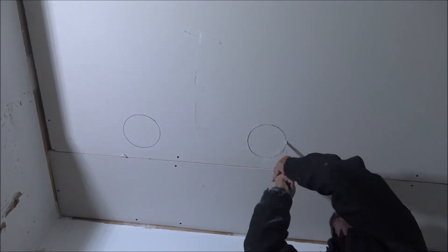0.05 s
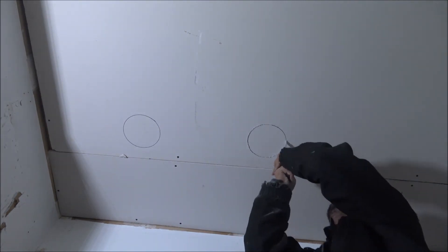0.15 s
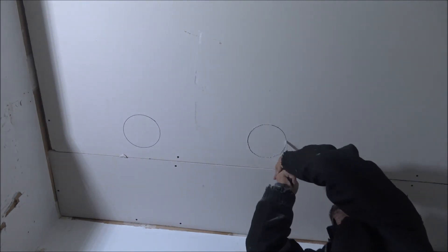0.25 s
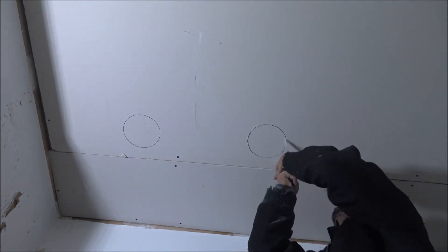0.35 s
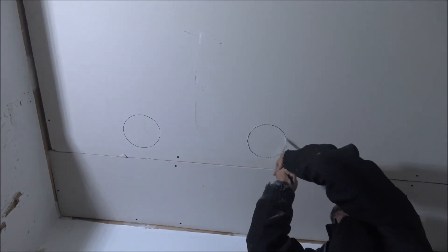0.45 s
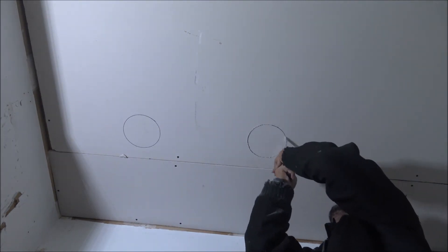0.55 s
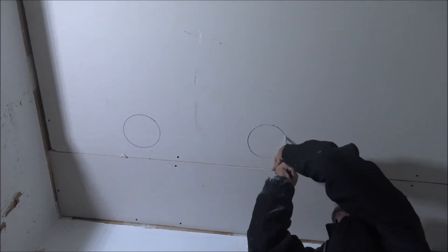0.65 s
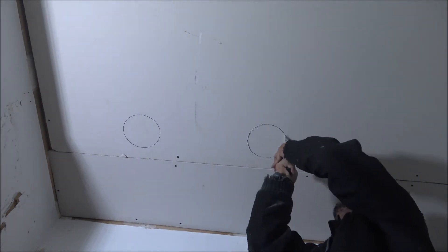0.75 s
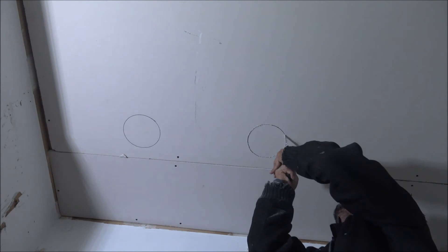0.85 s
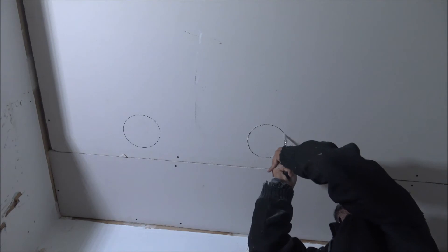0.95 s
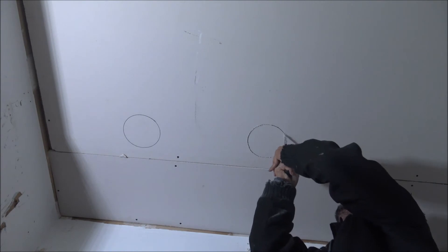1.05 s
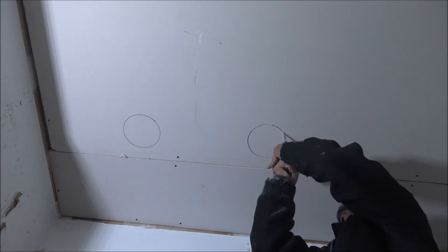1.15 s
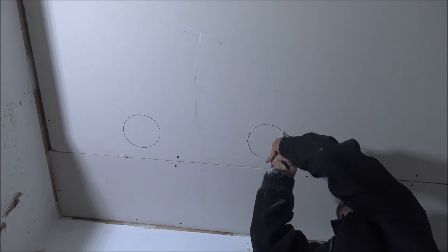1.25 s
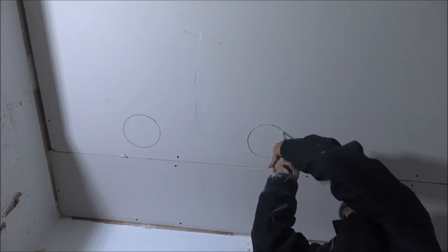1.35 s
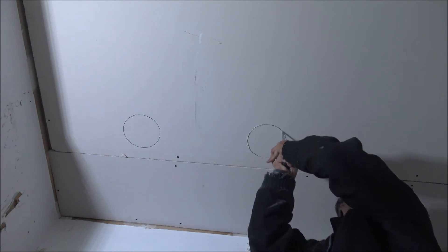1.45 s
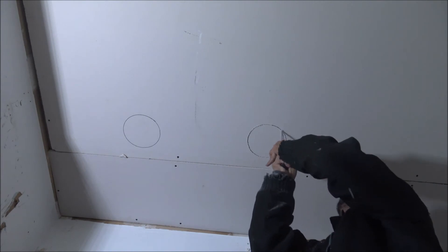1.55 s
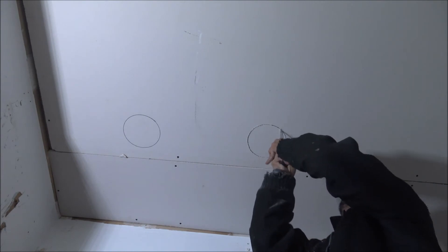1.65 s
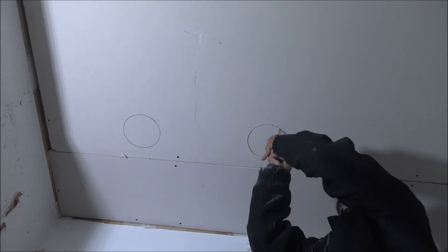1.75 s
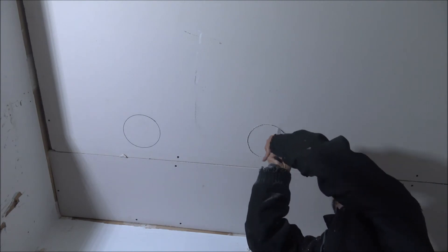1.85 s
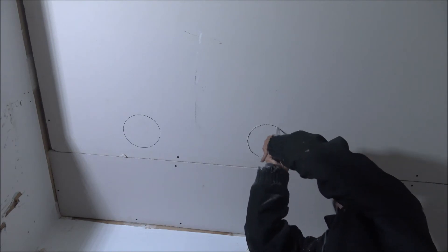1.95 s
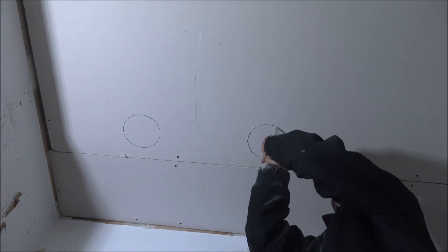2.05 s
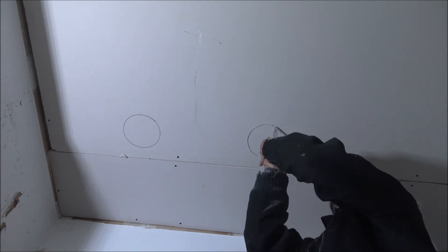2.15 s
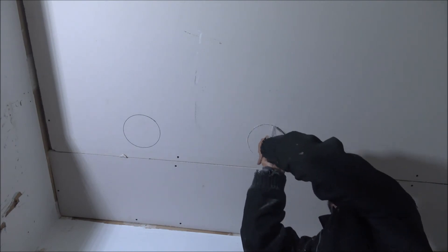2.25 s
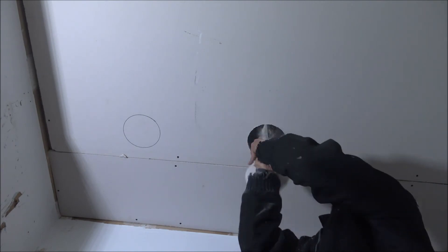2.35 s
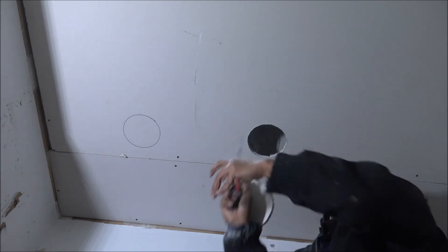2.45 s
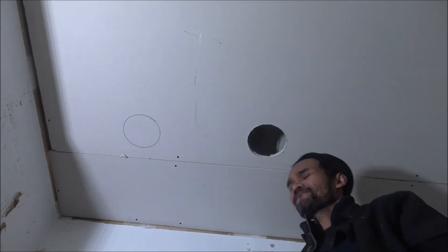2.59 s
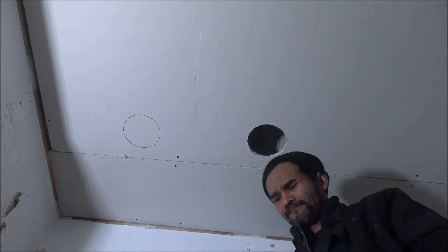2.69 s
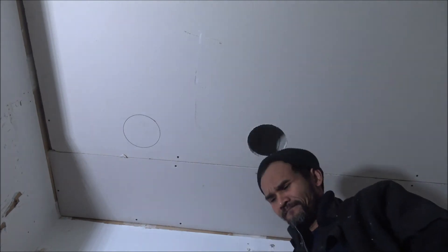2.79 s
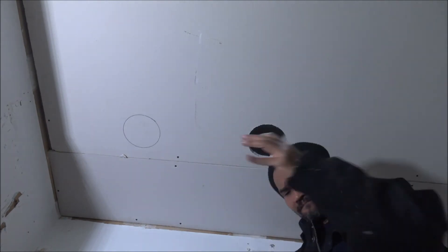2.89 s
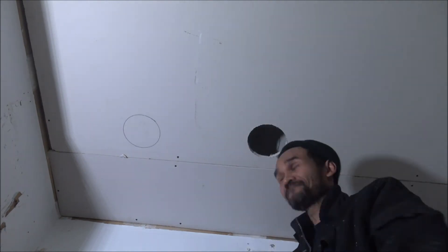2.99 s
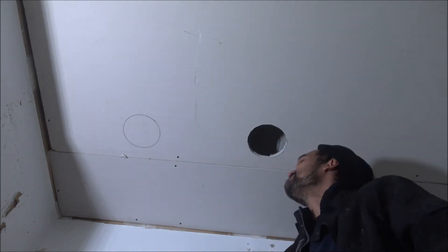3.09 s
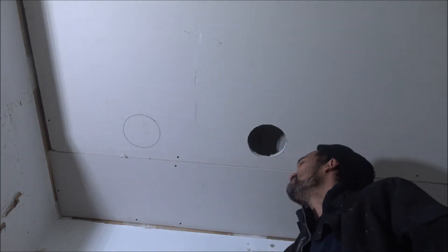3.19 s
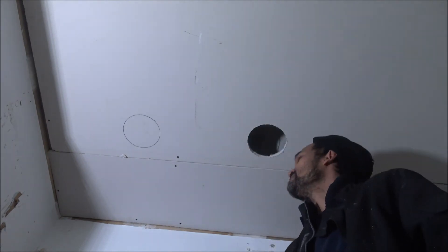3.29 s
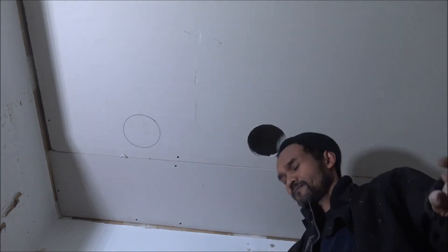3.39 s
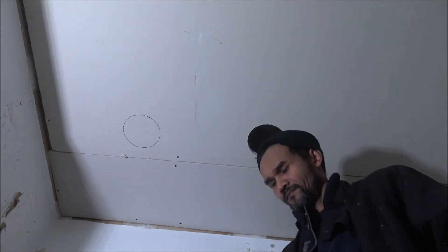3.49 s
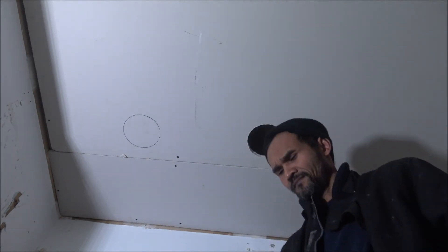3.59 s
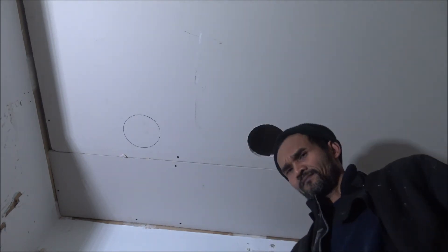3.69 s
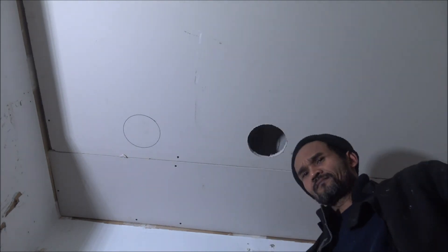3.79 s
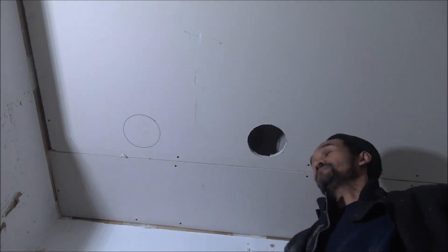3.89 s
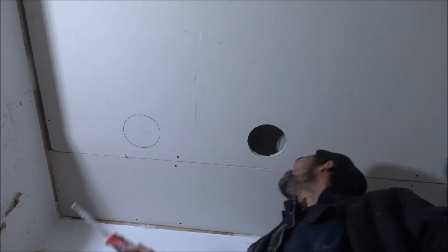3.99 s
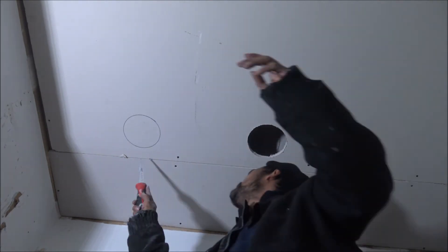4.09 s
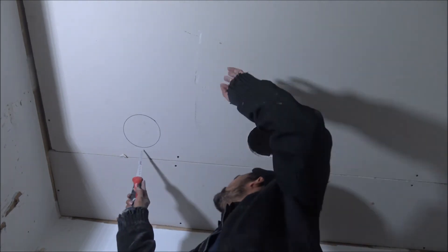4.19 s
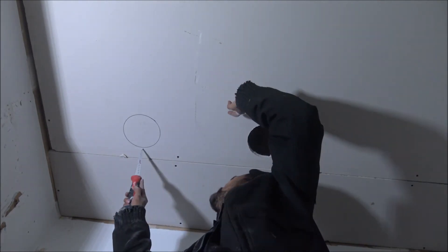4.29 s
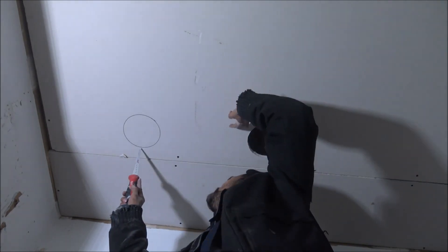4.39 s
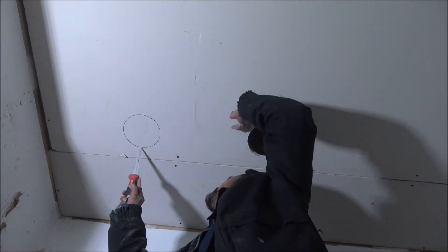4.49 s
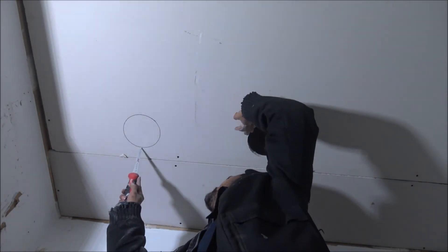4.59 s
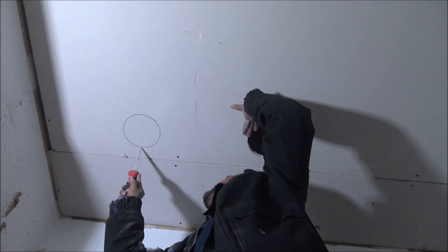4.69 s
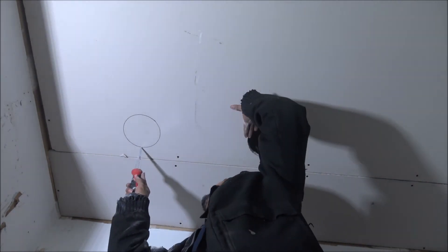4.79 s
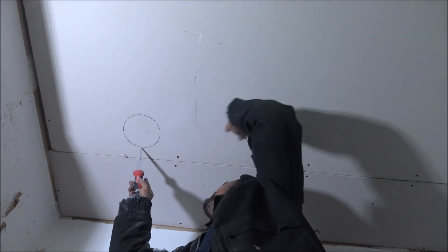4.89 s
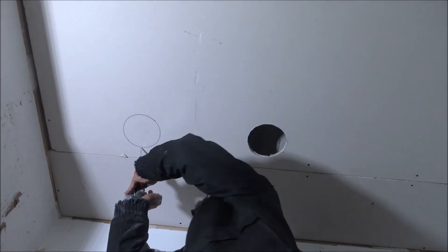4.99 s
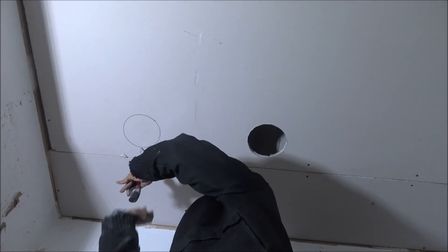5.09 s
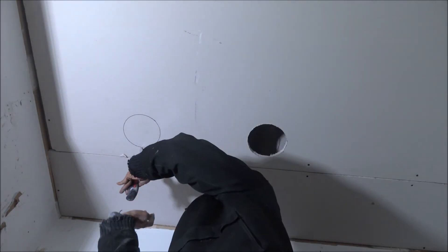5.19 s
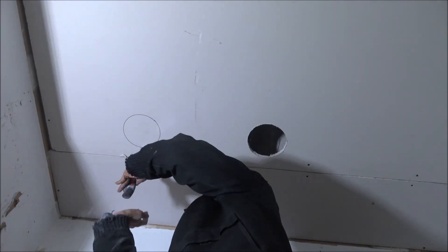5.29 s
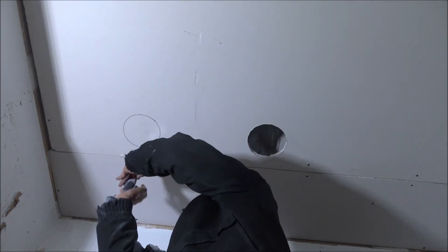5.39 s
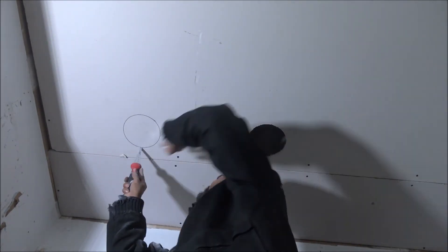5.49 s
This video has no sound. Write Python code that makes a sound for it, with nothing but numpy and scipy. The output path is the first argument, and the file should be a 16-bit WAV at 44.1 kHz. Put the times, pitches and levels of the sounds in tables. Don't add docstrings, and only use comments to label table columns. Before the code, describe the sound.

Fast hand sawing of hollow drywall, metallic blade scrapes, feet shuffling, light tip knocks, and three dull drum-like thumps in a small room.

```python
import sys
import numpy as np
from scipy import signal
from scipy.fft import rfft, irfft
from scipy.io import wavfile
from scipy.ndimage import uniform_filter1d, map_coordinates

SR = 44100
rng = np.random.default_rng(int(sys.argv[2]) if len(sys.argv) > 2 else 0)


def amplitude_ratio(level_db):
    exponent = np.asarray(level_db, float) / 20
    return 10 ** exponent


def generate_wav(signal):
    frames = np.transpose(np.atleast_2d(signal))
    scaled = np.clip(frames, -1, 1) * 32767
    pcm = np.round(scaled).astype(np.int16)
    wavfile.write(sys.argv[1], SR, pcm)


N = 244314
T = np.arange(N) / SR
HZ = np.fft.rfftfreq(16384, 1 / SR)

# time in seconds, stir of the worker in dB, hum level in dB.
BACKGROUND = [(0, 2.5, -58), (.1, 8, -52), (2.45, 12, -67), (2.95, 5, -62), (3.1, 3.5, -58),
              (3.2, -2.5, -55.5), (3.32, -0.5, -51), (3.36, 4, -53), (3.6, 0, -56.5), (3.8, 8, -53),
              (4.2, 8.5, -50), (4.4, 1.5, -58), (4.58, 2.5, -51.5), (4.7, 7.5, -52.5), (5.05, 4.5, -53),
              (5.54, 2, -53)]


def unit(x):
    return x / np.sqrt(np.mean(x ** 2) + 1e-20)


def along(points, hz):
    f, v = np.transpose(points)
    return np.interp(np.log(hz + 1), np.log(f + 1), v)


def causal(gain):
    cepstrum = irfft(np.log(gain + 1e-6 * gain.max()))
    half = len(cepstrum) // 2
    cepstrum[1:half] *= 2
    cepstrum[half + 1:] = 0
    h = irfft(np.exp(rfft(cepstrum)))[:8192]
    return h / np.linalg.norm(h)


def even(points_db):
    return np.fft.fftshift(irfft(amplitude_ratio(along(points_db, HZ))))


def through(x, h):
    return signal.fftconvolve(x, h)[:N]


def band(lo_hz, hi_hz):
    return 1 / np.sqrt((1 + (lo_hz / (HZ + 1)) ** 12) * (1 + (HZ / hi_hz) ** 12))


def body(tone, modes):
    lift = sum(amplitude_ratio(2 * db) / (1 + (2 * (HZ - hz) / width) ** 2) for hz, width, db in modes)
    return amplitude_ratio(along(tone, HZ)) * np.sqrt(1 + lift)


def grit(rate, spread_db, share):
    chance, size = rng.random(N), rng.exponential(1, N)
    sign, dust = rng.standard_normal(N), rng.standard_normal(N)
    bites = (chance < rate / SR) * amplitude_ratio(spread_db * np.minimum(size, 4)) * sign
    return np.sqrt(share) * unit(bites) + np.sqrt(1 - share) * dust


def voiced(rows, mix):
    return [(s, length, *(db + np.array([1, *controls]) @ np.array(mix)))
            for s, length, db, *controls in rows]


def contacts(rows, material, gains, attack, sag_db, t60, boost_db, lead=0, **grain):
    part_edges = {"saw": [(250, 750), (750, 2500), (2500, 20000), (20, 250)], "steel": [(20, 1500),
                  (1500, 4500), (4500, 7500), (7500, 20000)], "feet": [(20, 300), (300, 2000), (2000, 6000),
                  (6000, 20000)], "tip": [(20, 800), (800, 2000), (2000, 6000), (6000, 20000)],
                  "palm": [(20, 300), (300, 1000), (1000, 3500), (3500, 20000)]}
    attacks, leads = np.broadcast_to(attack, 4), np.broadcast_to(lead, 4)
    power = np.zeros((4, N + SR))
    for s, length, *levels in rows:
        t = np.arange(-round(.02 * SR), round((length + max(t60)) * SR)) / SR
        start = round((s + t[0]) * SR)
        held_db = sag_db * np.clip(t / length, 0, 1) ** 3
        for part, db, fall, up, early in zip(power, levels, t60, attacks, leads):
            rise = np.sin(np.pi / 2 * np.clip((t + early) / min(up, length + early), 0, 1)) ** 2
            decay_db = -60 * np.maximum(t - length, 0) / fall
            part[start:][:len(t)] += (rise * amplitude_ratio(db + held_db + decay_db)) ** 2
    drives = np.sqrt(power[:, :N]) * amplitude_ratio(boost_db) * grit(**grain)
    return [sum(through(drive, causal(gain * band(*edge)))
                for drive, edge in zip(drives, part_edges[material])) for gain in gains]


def patchy(x, depth_db):
    z = signal.stft(x, nperseg=512)[2]
    field = uniform_filter1d(rng.standard_normal(z.shape), size=5, axis=0)
    field = uniform_filter1d(field, size=6, axis=1)
    gain = amplitude_ratio(depth_db * unit(field))
    return signal.istft(z * unit(gain), nperseg=512)[1][:N]


def air():
    # frequency in Hz, level in dB per Hz.
    air_tone = [(40, -33), (58, -22), (78, -27), (130, -20), (240, -25.5), (480, -21), (900, -27.5),
                (2000, -32), (4600, -33), (5600, -37), (15500, -38.5), (16500, -62.5)]
    # level at rest in dB, growth in dB per dB of stir.
    stir_mix = [(-59.5, 0.73), (-63.5, 0.7), (-66.5, 1.33)]
    s, stir_db, _ = np.transpose(BACKGROUND)
    stir_db = np.interp(T, s, stir_db)
    tone = amplitude_ratio(along(air_tone, HZ))
    shapes = [tone * band(40, 2200), tone * band(2200, 5700), tone * band(6000, 20000)]
    layers = [amplitude_ratio(db + grows * stir_db) * through(rng.standard_normal(N), causal(shape))
              for (db, grows), shape in zip(stir_mix, shapes)]
    return patchy(sum(layers), depth_db=-0.5)


def waver(rate):
    return map_coordinates(rng.standard_normal(int(N * rate / SR) + 4), [T * rate])


def hum():
    s, _, hum_db = np.transpose(BACKGROUND)
    level_db = np.interp(T, s, hum_db) - 0.5 + 1.5 * waver(7)
    phase = 2 * np.pi * np.cumsum(99 + 5 * waver(11)) / SR
    return amplitude_ratio(level_db) * np.sin(phase)


def feet():
    # start in seconds, length in seconds, force in dB, weight in dB, falling dust in dB.
    moves = [(.105, 0.012, -46, -13, -11), (.143, 0.0054, -33.5, -3, -4), (3.335, 0.024, -63, 1, 2),
             (3.666, 0.022, -49.5, 12.5, 3), (3.691, 0.036, -41, -7, 4.5), (3.716, 0.015, -33.5, -5, -6),
             (3.762, 0.019, -51, 6, 5), (3.79, 0.012, -54, -6, 13), (3.867, .012, -33, -4, -8),
             (3.89, 0.025, -56, 13, -2), (3.96, 0.0098, -26, -14, -15), (4.0, 0.038, -53, -1, 5),
             (4.046, 0.016, -32, -12, 4), (4.058, 0.01, -28, 1, 4), (4.095, 0.021, -45, -19, 11),
             (4.135, 0.031, -48.5, -11, -1)]
    # frequency in Hz, width in Hz, lift in dB.
    ladder = [(163, 61, 1), (571, 48, -5), (975, 94, 5.5), (3160, 560, 13.5), (4460, 420, 11.5)]
    # frequency in Hz, level in dB per Hz.
    move_tone = [(20, -53), (80, -20), (160, -1.5), (230, -17.5), (600, -8.5), (1360, -18), (4600, -23.5),
                 (15500, -26.5), (16500, -46.5)]
    # dB per dB in thud, knock, scuff and dust; the first is dB over the force.
    feet_mix = [(0.14, 0.55, -1.6, -1.5), (1, 0.22, -0.17, 0.1), (0, -0.13, 0.19, 0.93)]
    return contacts(voiced(moves, feet_mix), "feet", [body(move_tone, ladder)], attack=0.0015, sag_db=-2.5,
                    t60=[0.099, 0.099, 0.046, 0.057], boost_db=-0.5, rate=3600, spread_db=0.5, share=0.4)[0]


def strokes():
    # start in seconds, force in dB, sheet flex in dB.
    run_a = [(0.161, -21, -6), (0.264, -19.5, -6), (0.321, -14.5, 1.5), (0.367, -16, -8.5), (0.428, -18, 2),
             (0.478, -17.5, -3.5), (0.526, -17.5, 2), (0.575, -17, -5), (0.619, -19, 3),
             (0.696, -19.5, -1.5), (0.77, -20, 6), (0.849, -20.5, -1), (0.912, -18.5, 6),
             (0.97, -18.5, -1.5), (1.023, -18, 2), (1.075, -17, -5), (1.122, -12.5, 3.5),
             (1.153, -18.5, -2.5), (1.2, -18, 2.5), (1.242, -18.5, 1.5), (1.283, -17.5, 4),
             (1.335, -20.5, -0.5), (1.392, -25, -3), (1.438, -28, -3.5)]
    run_b = [(1.495, -18.5, 2.5), (1.538, -19, -5), (1.595, -12.5, 2.5), (1.643, -18, -4),
             (1.697, -15.5, 3.5), (1.727, -21.5, 4.5), (1.779, -19, 6.5), (1.822, -23.5, 6),
             (1.863, -15.5, 4), (1.908, -19, 0), (1.95, -20, 4.5), (1.995, -22.5, 7.5), (2.036, -18.5, 6),
             (2.085, -21, 4.5), (2.126, -20.5, 6), (2.179, -24, 8.5), (2.221, -21.5, 6.5),
             (2.265, -24, 1.5), (2.307, -18, 3), (2.351, -20.5, -2)]
    crumble_a = [-0.46, 1, 0.25, .5, -1, -.5, 0, -1.5, -0.43, 0.36, 0, 1.2, 0, -1, 0.25, -1.2, -0.7, -.5, 1,
                 -.5, 1, -1.1, 0, 0.97]
    crumble_b = [.5, 0, 0, 0, -.5, 1, -.5, 1.5, -1, 1, 0, .5, 0, -1, -1, .5, 0, 1, 1, 1]
    # start in seconds, length in seconds, force in dB, sheet flex in dB.
    drags = [
        (.167, .006, -22, -5),
        (.25, 0.024, -23, -2),
        (.668, 0.032, -34.5, -6),
        (.75, 0.018, -38.5, -6.5),
        (.815, .036, -38, 0.5),
    ]
    # dB over the force, or dB per dB, in board, rasp, grit and boom.
    pull_mix = [(0, 0.33, -7, -8.5), (.95, 0.075, 0, -0.5)]
    push_mix = [(0, -0.39, -6.5, -10.5), (.95, 0.23, 0.13, -0.06)]
    wear_db_per_s = (-0.3, -0.5, -0.35, -1.7)
    crumble_mix = (0, 0, 1, 0.07)
    # share of the time to the turn, longest bite in s
    fill, longest_s = (0.95, 1.066), (.045, 0.058)
    rows = []
    for run, crumble, last_s in zip((run_a, run_b), (crumble_a, crumble_b), (0.032, 0.075)):
        gaps = np.diff([row[0] for row in run])
        lengths = [min(fill[k % 2] * gap, longest_s[k % 2]) for k, gap in enumerate(gaps)] + [last_s]
        for k, ((s, db, flex), length) in enumerate(zip(run, lengths)):
            mix = (pull_mix, push_mix)[k % 2]
            growth_s = s - run_b[0][0]
            rows += voiced([(s, length, db, flex, growth_s, crumble[k])], [*mix, wear_db_per_s, crumble_mix])
    return rows + voiced(drags, push_mix)


def saw():
    # frequency in Hz, width in Hz, lift in dB with a short cut, lift in dB with a long cut.
    sheet = [(131.5, 12, 14.5, 14), (290, 13, 17, 9.5), (390, 17.7, 19, 2.5), (457, 63, 4.5, 10.5),
             (569.6, 29.4, 11.5, 15.5), (727, 19, 8.5, 8.5), (989, 18, 14.5, 9), (1076.5, 29, 11, 2),
             (1272, 23, 11, 3.5), (1462, 23, 8, 9), (1660, 37, 5, 5), (1947, 96, 7.5, 7),
             (215, 16, 4.5, -0.5), (2440, 50, 4.5, -0.5), (4120, 90, 4.5, 8), (4930, 480, 4.5, 3.5),
             (9630, 350, 0.5, 2.5), (10460, 250, 5.5, 7.5), (11150, 350, 9, 1), (13200, 500, 3, 4.5),
             (14700, 800, 2.5, 4.5)]
    # frequency in Hz, level in dB per Hz.
    saw_tone = [(20, -34.5), (70, -41), (110, -21.5), (170, -22), (330, -13.5), (600, -9.5), (1000, -4),
                (1950, -14), (2350, -22), (2900, -29.5), (6000, -35), (8300, -35), (12400, -36),
                (15600, -33.5), (16500, -62.5)]
    gains = [body(saw_tone, np.array(sheet)[:, [0, 1, lift]]) for lift in (2, 3)]
    short, long = contacts(strokes(), "saw", gains, attack=[.034, 0.033, 0.026, 0.034], sag_db=-9,
                           t60=[0.054, 0.044, 0.017, 0.1], boost_db=3.5, lead=[0.0089, .009, 0.0056, 0.01],
                           rate=1200, spread_db=2.5, share=0.27)
    cut = np.clip((T - .9) / 0.5, 0, 1)
    return (1 - cut) * short + cut * long


def setting_tip():
    # start in seconds, length in seconds,
    # force in dB, weight in dB.
    setting = [(2.353, 0.078, -30.5, -10), (4.31, 0.0064, -55, -14), (4.475, 0.0061, -55, 4.5),
               (4.627, 0.0072, -40.5, -3), (4.672, 0.027, -51.5, 7), (4.714, 0.023, -53, 13),
               (4.735, 0.012, -38, 5), (4.77, 0.0084, -39.5, 5), (4.787, 0.009, -34, -14),
               (4.813, 0.0083, -39.5, 3), (4.841, 0.0069, -40.5, -8), (4.886, 0.01, -43.5, 4),
               (4.905, 0.045, -54, 3), (4.94, 0.041, -51.5, -1.5), (5.04, 0.025, -54, -2),
               (5.505, 0.012, -47.5, 0), (5.53, .01, -51, 0)]
    # frequency in Hz, width in Hz, lift in dB.
    tip_modes = [(598, 23, 14.5), (984, 35, 7.5), (1200, 15, -10), (1440, 28, 8), (2960, 220, 11),
                 (11800, 300, 7)]
    # frequency in Hz, level in dB per Hz.
    tip_tone = [(60, -40), (200, -16.5), (500, -15.5), (1400, -5.5), (2400, -15), (15500, -6), (16500, -42)]
    # dB over the force, or dB per dB, in board, handle, scratch and dust.
    tip_mix = [(0, 0.19, -0.86, 1.6), (.8, 1, -0.044, 0)]
    return contacts(voiced(setting, tip_mix), "tip", [body(tip_tone, tip_modes)], attack=0.00073, sag_db=-3.5,
                    t60=[0.14, 0.14, 0.073, 0.053], boost_db=-1.2, rate=2400, spread_db=5.5, share=0.18)[0]


def whine():
    # frequency in Hz, level in dB.
    whine_tones = [(479, -69), (3074, -74.5), (4597, -77)]
    return sum(amplitude_ratio(db + 3.5) * np.sin(2 * np.pi * hz * T) for hz, db in whine_tones) * (T > 2.45)


def squeaks():
    # start in seconds, length in seconds, frequency in Hz, level in dB.
    rubs = [
        (2.52, 0.037, 6500, -66),
        (3.37, .14, 1900, -62.5),
        (3.58, .06, 7450, -71.5),
        (4.4, 0.085, 2520, -65),
        (4.887, 0.024, 1180, -32),
        (4.928, 0.079, 600, -52),
        (4.904, 0.15, 6340, -58),
        (4.897, 0.11, 9200, -57),
        (5.031, 0.058, 600, -47),
    ]
    out = np.zeros(N + SR)
    for s, length, hz, db in rubs:
        t = np.arange(round(length * SR)) / SR
        resonance = causal(1 / (1 + ((HZ - hz) / (.035 * hz)) ** 2))
        rub = signal.fftconvolve(rng.standard_normal(SR // 4), resonance)[4096:]
        out[round(s * SR):][:len(t)] += amplitude_ratio(db + 2.5) * np.sin(np.pi * t / length) * rub[:len(t)]
    return out[:N]


def blade_scrapes():
    # start in seconds, length in seconds, force in dB, weight in dB, blade freedom in dB.
    scrapes = [(2.561, 0.0043, -28.5, -9, -17), (2.621, 0.035, -19, -11, 2),
               (2.662, .028, -16.5, -12.5, -6), (2.7, 0.039, -40, -12, 1), (2.751, 0.016, -25, -2.5, 3.5),
               (2.766, 0.0085, -23.5, -2, -3), (2.781, 0.012, -14.5, -2.5, -18),
               (2.794, 0.015, -19.5, 4, -12), (2.812, 0.02, -33.5, 11, -11),
               (2.845, 0.0051, -38.5, 16, 7.5), (2.862, .0087, -40, 8, -8),
               (2.889, 0.0054, -41.5, -14, 3.5), (2.97, 0.012, -24.5, 3, 9), (2.998, 0.0047, -37.5, 11, 8)]
    # frequency in Hz, width in Hz, lift in dB.
    blade = [(620, 70, 0), (2020, 130, 11), (2810, 370, 13), (3220, 640, 9), (6550, 330, 13.5)]
    # frequency in Hz, level in dB per Hz.
    steel_tone = [(20, -52), (90, -39), (150, -20), (230, -27), (600, -10), (2750, -11.5), (6500, -3),
                  (8000, -12), (15500, -13.5), (16500, -43)]
    # dB over the force, or dB per dB, in knock, scrape, ring and fizz.
    steel_mix = [(0, 0.0023, 0.035, -1.1), (0.99, 0.0051, 0.071, 0.13), (0.13, 0.0048, 0.84, 0.56)]
    return contacts(voiced(scrapes, steel_mix), "steel", [body(steel_tone, blade)], attack=0.00063, sag_db=-4.5,
                    t60=[0.082, 0.047, 0.058, 0.067], boost_db=1.95, rate=2700, spread_db=2.0, share=0.2)[0]


def thumps():
    # time in seconds, level in dB.
    palm_hits = [
        (5.161, -15),
        (5.267, -15.5),
        (5.377, -24.5),
    ]
    # frequency in Hz, level in dB, t60 in seconds.
    drum = [(137, -8, 0.24), (222, -1, .05), (556, -1, .11), (746, 1.5, 0.13), (1050, -11, 0.071),
            (1235, -17, 0.06), (1490, -8, 0.069), (1690, -12, .06)]
    out, t = np.zeros(N + SR), np.arange(SR // 2) / SR
    for s, db in palm_hits:
        ring = sum(amplitude_ratio(level - 60 * t / np.clip(t60, .03, .4)) * np.sin(2 * np.pi * hz * t)
                   for hz, level, t60 in drum)
        out[round(s * SR):][:len(t)] += amplitude_ratio(db) * ring * (1 - np.exp(-t / 0.0018))
    return out[:N]


def palm_blows():
    # start in seconds, length in seconds, force in dB, bite in dB.
    blows = [
        (5.162, 0.023, -14, -4),
        (5.192, 0.005, -16, 5),
        (5.268, 0.036, -15, -2.5),
        (5.298, 0.011, -15, 0.5),
        (5.378, 0.028, -10, 4),
        (5.412, 0.0057, -20.5, 16),
        (5.43, 0.035, -31.5, -3),
    ]
    # frequency in Hz, width in Hz, lift in dB.
    struck = [(142, 11, 1.5), (265, 17, 3), (576, 61, 12), (756, 63, 2.5)]
    # frequency in Hz, level in dB per Hz.
    blow_tone = [(20, -48), (70, -24), (135, -11.5), (250, -11), (760, -6), (1500, -6.5), (2300, -13.5),
                 (4200, -23), (8000, -25.5), (15500, -29.5), (16500, -49)]
    # dB over the force, or dB per dB, in boom, board, crunch and grit.
    palm_mix = [(-12.5, 0.005, -5.5, -16), (-1.3, 0, 0.7, 0.5)]
    return contacts(voiced(blows, palm_mix), "palm", [body(blow_tone, struck)], attack=0.00068, sag_db=-5.0,
                    t60=[0.26, 0.12, 0.051, 0.02], boost_db=3.96, rate=1500, spread_db=2.0, share=0.21)[0]


def tail():
    # frequency in Hz, t60 in seconds.
    walls = [(110, 0.48), (210, 0.19), (500, 0.11), (2000, 0.12), (10000, 0.085)]
    hz, t, z = signal.stft(rng.standard_normal(SR // 2), SR, nperseg=512)
    decay = amplitude_ratio(-60 * t / along(walls, hz)[:, None])
    h = signal.istft(z * decay, SR, nperseg=512)[1]
    return h / np.linalg.norm(h)


def side_signal(cutting, handled):
    # frequency in Hz, side minus mid in dB.
    echo_width = [(60, -68), (110, -59), (200, -41.5), (380, -30.5), (700, -22.5), (1290, -18), (4400, -14),
                  (8120, -18.5), (15000, -16.5)]
    # frequency in Hz, side minus mid in dB.
    air_width = [(110, -49.5), (200, -28), (380, -15), (700, -14.5), (4400, -15), (8100, -16.5),
                 (15000, -20)]
    # frequency in Hz, left minus right in dB.
    lean_db = [(200, 0.5), (1290, .5), (2380, 3), (4400, 1), (15000, 0.5)]
    lean = np.fft.fftshift(irfft(np.tanh(along(lean_db, HZ) * np.log(10) / 40)))
    echoes = amplitude_ratio(-4.5) * signal.fftconvolve(through(cutting + handled, tail()), even(echo_width), "same")
    direct = signal.fftconvolve(0.31 * cutting + handled, lean, "same")
    return echoes + direct + signal.fftconvolve(air(), even(air_width), "same")


def scene():
    cutting = patchy(saw(), depth_db=2.0)
    handled = patchy(feet() + setting_tip() + blade_scrapes() + palm_blows(), depth_db=2.5)
    handled = handled + squeaks() + thumps()
    work = cutting + handled
    mid = amplitude_ratio(-1.05) * work + amplitude_ratio(-8.5) * through(work, tail())
    mid = mid + air() + hum() + whine()
    side = side_signal(cutting, handled)
    return np.array([mid + side, mid - side])


def limited(x):
    ceiling_db, level_s = -11.5, 0.009
    size = round(level_s * SR)
    power = uniform_filter1d(x.mean(0) ** 2, size=size)
    power = np.abs(uniform_filter1d(power, size=size // 2))
    return x / (1 + (power / amplitude_ratio(2 * ceiling_db)) ** 2) ** (1 / 4)


def roll_off(x):
    return signal.sosfilt(signal.butter(12, 16800, fs=SR, output="sos"), x)


def record(dry):
    x = limited(dry)
    x = x / (1 + np.abs(x / 0.8) ** 4) ** (1 / 4)
    x = signal.fftconvolve(x, even([(15720, 0.5), (15900, -40)])[None], "same", axes=1)
    return roll_off(x)


dry = scene()
out = record(dry)
generate_wav(out)
```